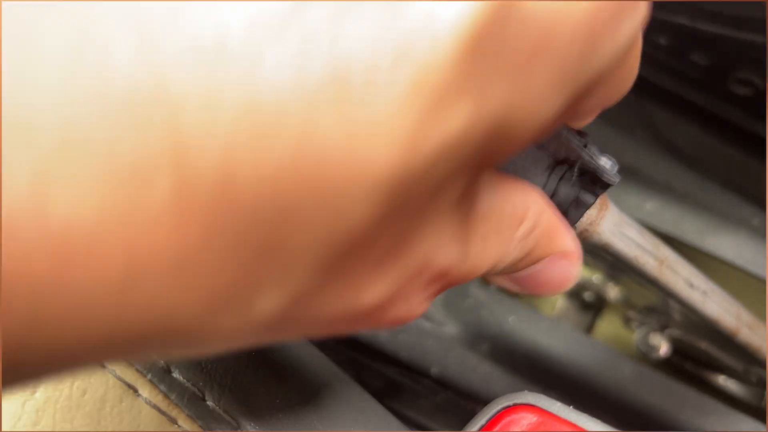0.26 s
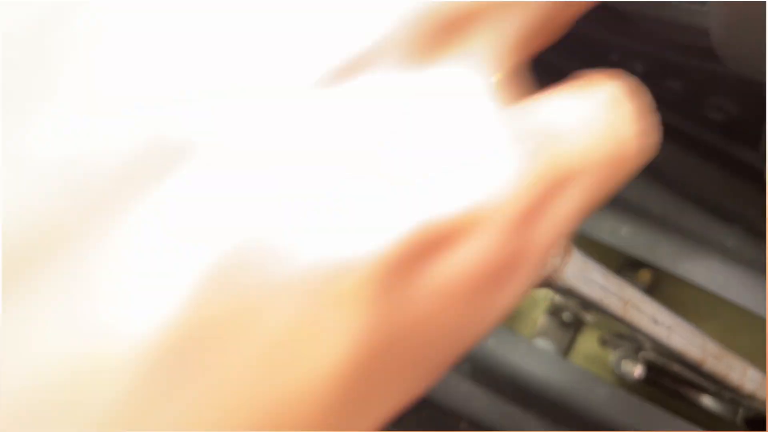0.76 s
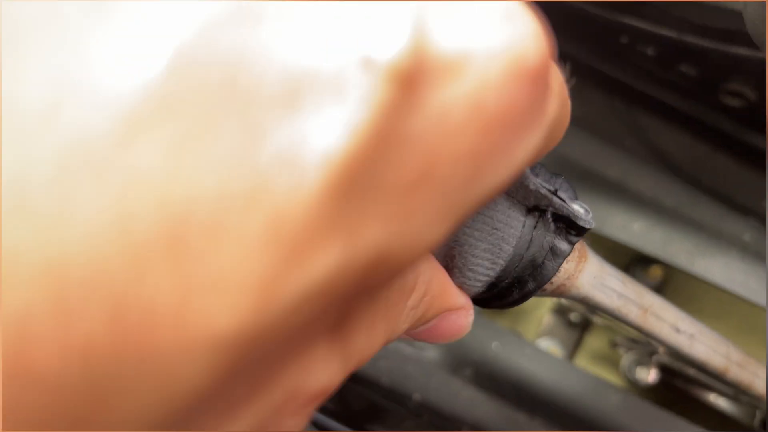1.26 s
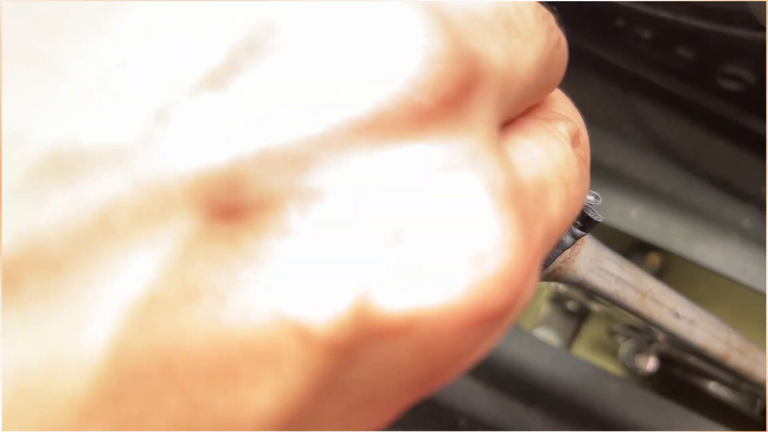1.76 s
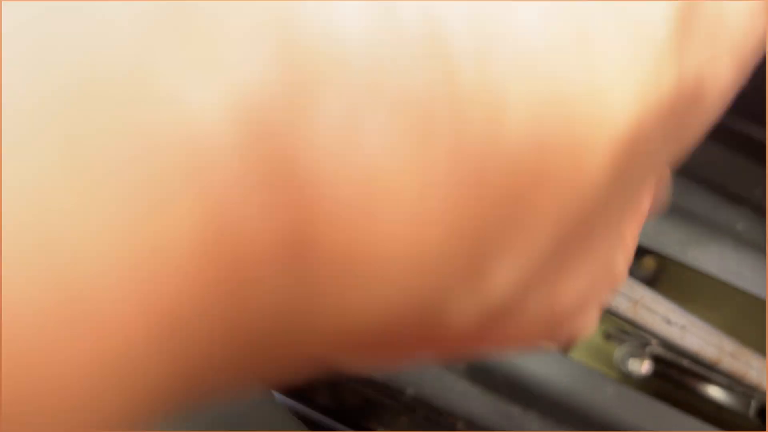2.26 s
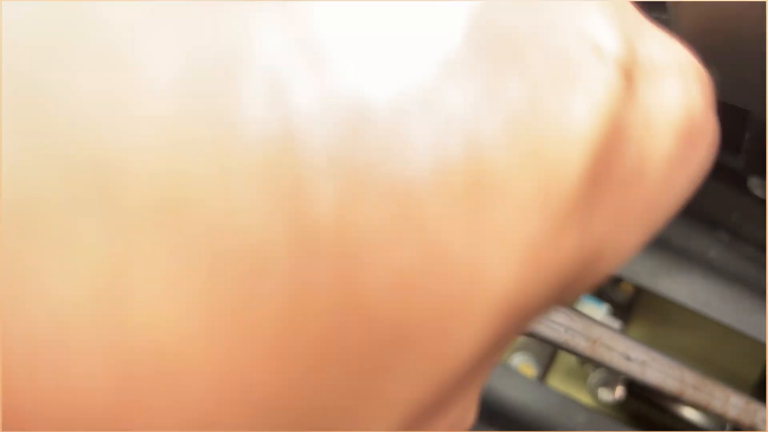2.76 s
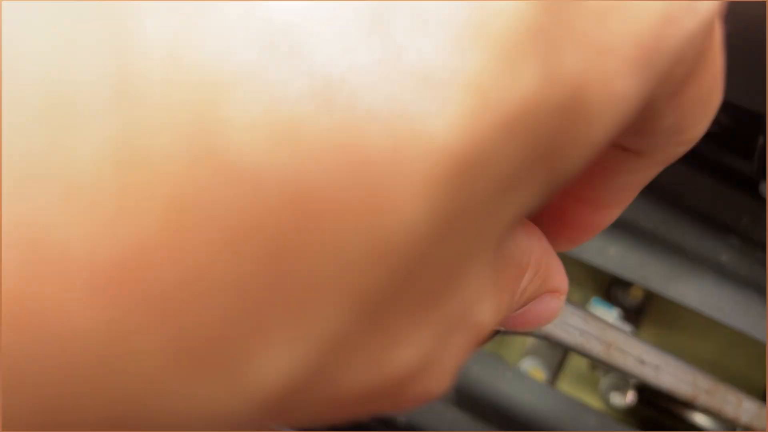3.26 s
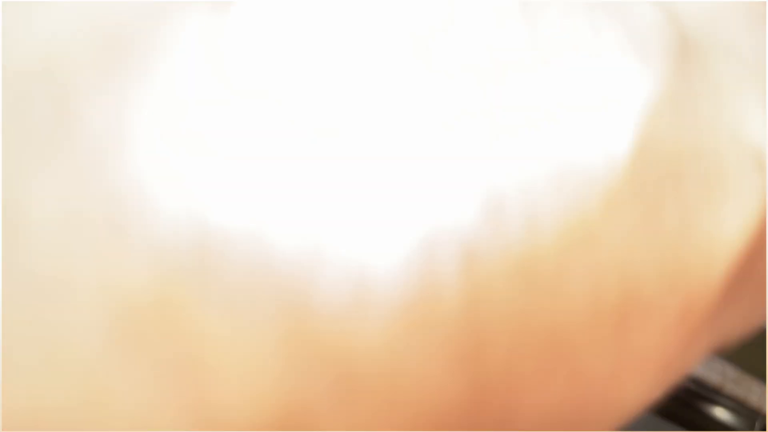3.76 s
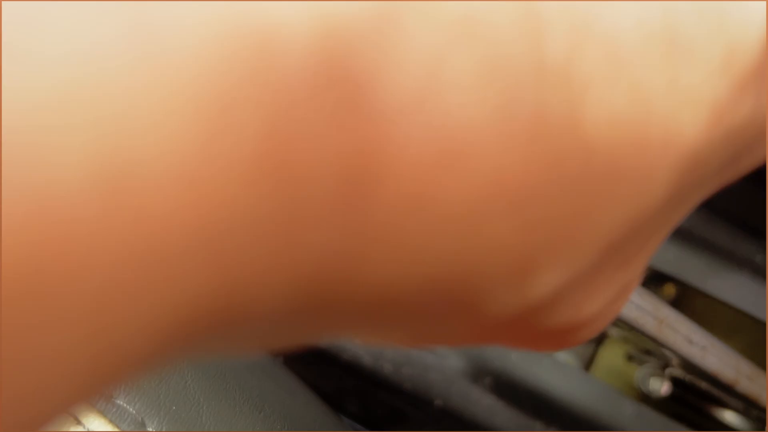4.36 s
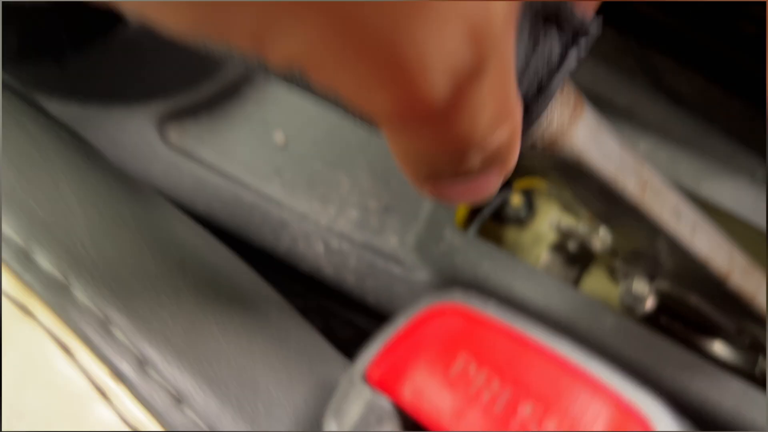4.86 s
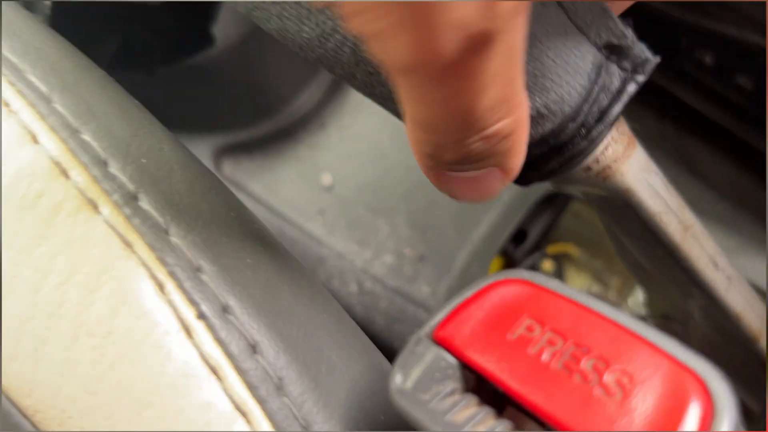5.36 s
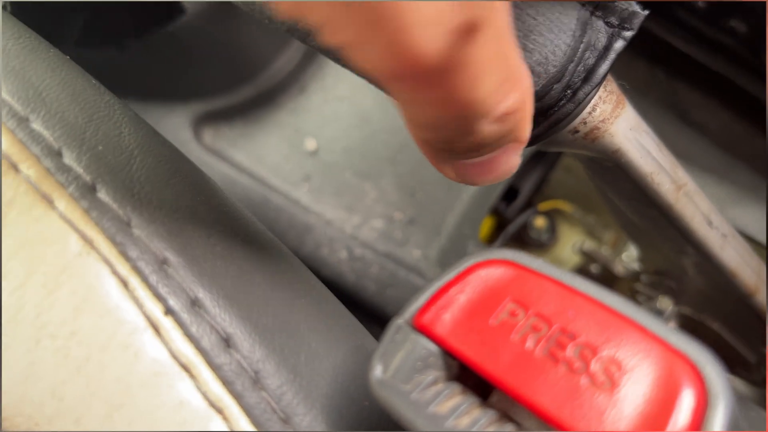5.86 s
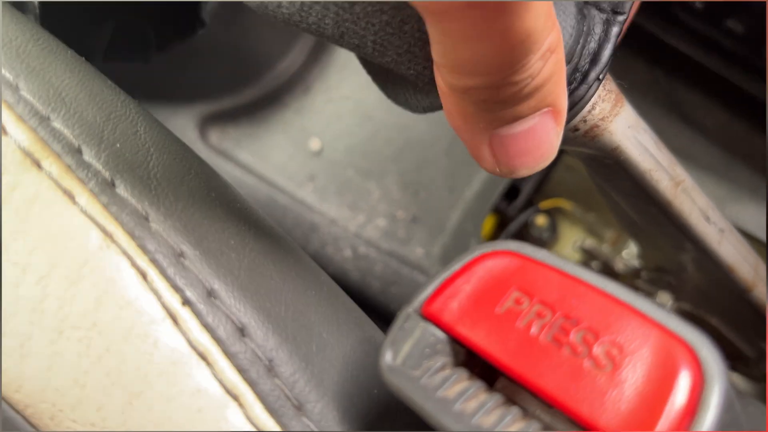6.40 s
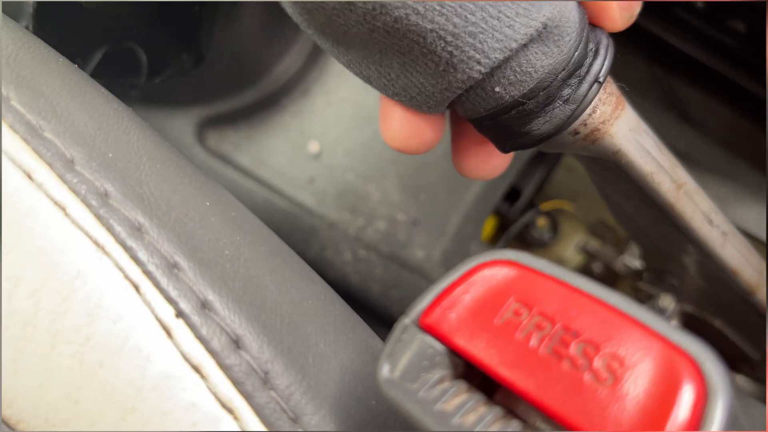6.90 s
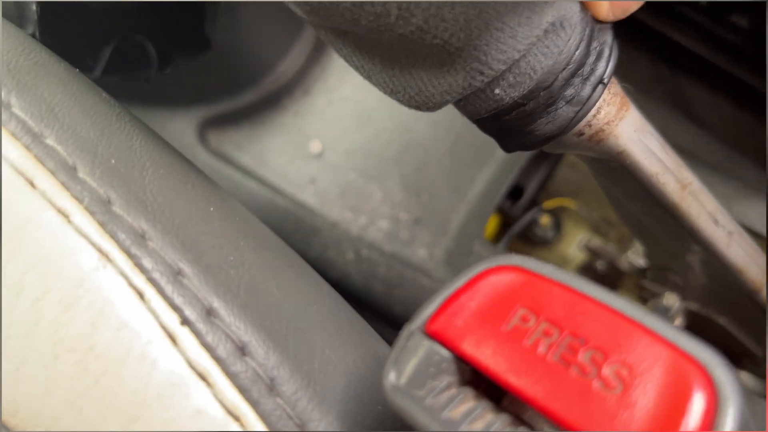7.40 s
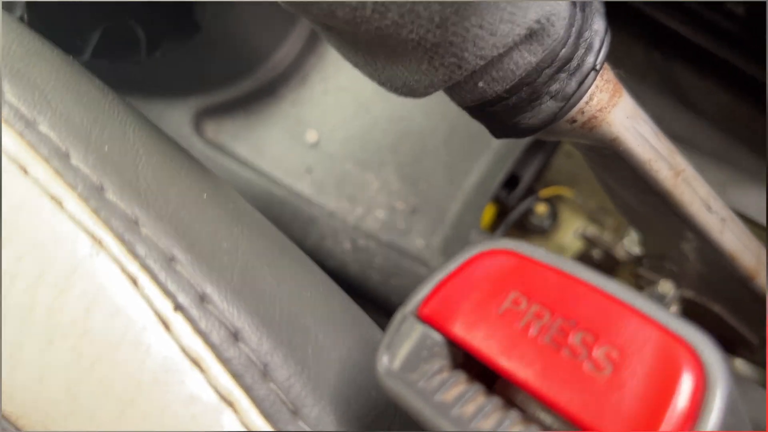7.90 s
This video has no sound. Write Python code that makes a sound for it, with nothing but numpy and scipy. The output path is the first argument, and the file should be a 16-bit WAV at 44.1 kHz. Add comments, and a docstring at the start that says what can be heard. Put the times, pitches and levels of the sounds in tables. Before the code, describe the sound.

Close-up fabric rustling with sharp plastic snaps, short scrapes and dull bumps, a tiny finger squeak midway, over a faint low hum in a car.

```python
"""A hand works a fabric boot with a plastic collar onto a lever in a small, dead car cabin, over a low hum.
From the start cloth swishes and rasps in filtered grains, the collar drags in stick-slip and soft bumps of
the trim settle on low pitches; an early instant is silent. Then noise-driven resonances snap, from 1.3 s the
rim knocks ringing console modes, and near 5 s a finger squeaks in gliding overtones; the cloth works on to
the end. Direct sound and short diffuse tails reach two close microphone ports."""
import sys
import numpy as np
from scipy import signal
from scipy.fft import rfft, irfft, next_fast_len
from scipy.io import wavfile
from scipy.ndimage import uniform_filter1d

SR = 44100
rng = np.random.default_rng(int(sys.argv[2]) if len(sys.argv) > 2 else 0)


def master_out(mix):
    """Clip the mix to full scale and print it as 16-bit PCM to the path in sys.argv[1]."""
    frames = np.transpose(np.atleast_2d(mix))
    ceiling = np.clip(frames, -1, 1)
    pcm = np.round(ceiling * 32767).astype(np.int16)
    wavfile.write(sys.argv[1], SR, pcm)


N = 358974
T = np.arange(N) / SR


def undb(db):
    """Decibels to gain."""
    return 10 ** (np.asarray(db) / 20)


def unit(x):
    """Scale to rms 1."""
    return x / np.sqrt(np.mean(x ** 2) + 1e-18)


def burst(x):
    """Scale a hit to the energy of 10 ms at rms 1."""
    return x / np.sqrt(np.sum(x ** 2) / (SR / 100) + 1e-18)


def add(out, s, x):
    """Mix x into out from time s in seconds."""
    i = max(int(s * SR), 0)
    out[i:i + len(x)] += x[:N - i]


def colour(x, points, size=16384):
    """Causal, minimum-phase filter with a smooth (Hz, dB) response."""
    points_hz, points_db = np.transpose(points)
    bins_hz = np.fft.rfftfreq(size, 1 / SR) + 1
    gain = undb(np.interp(np.log(bins_hz), np.log(points_hz), points_db))
    # folding the cepstrum forward in time makes the filter causal
    cepstrum = irfft(np.log(gain))
    cepstrum[1:size // 2] *= 2
    cepstrum[size // 2 + 1:] = 0
    impulse = irfft(np.exp(rfft(cepstrum)))
    return signal.fftconvolve(x, impulse[:len(x)])[:len(x)]


def resonate(x, hz, width):
    """One resonance, gain 1 at its centre; width in Hz."""
    return signal.lfilter(*signal.iirpeak(hz, hz / width, fs=SR), x)


def walk(rate):
    """Smooth random wander of rms near 1, with rate fresh values a second."""
    k = int(SR / rate)
    steps = np.repeat(rng.standard_normal(N // k + 1), k)
    return unit(uniform_filter1d(uniform_filter1d(steps, k), k)[:N])


def grains(rate, length, spread_db):
    """Random tiny slips, rate a second, a few much stronger than the rest."""
    chance = rng.random(length)
    size = np.minimum(rng.exponential(size=length), 4)
    return (chance < rate / SR) * undb(spread_db * size) * rng.choice([-1, 1], length)


def cabin(level_db=-44, hum_hz=80.94, hum_db=-47):
    """Low rumble and a wavering hum, alike at both ports, under a faint wide hiss."""
    # Spectrum of the cabin air. Each row: frequency in Hz, density in dB per Hz.
    air_spectrum = [(20, -13), (35, -12), (55, 0.5), (75, 3.5), (105, -9.5), (145, -9.5), (190, -16.5),
                    (240, -14), (330, -24.5), (520, -35), (700, -36.5), (2200, -48.5), (5000, -45.5),
                    (14000, -127)]
    mid = unit(colour(rng.standard_normal(N), air_spectrum))
    side = unit(colour(rng.standard_normal(N), air_spectrum))
    # the two ports differ mostly above the rumble
    side = colour(side, [(60, -35.5), (200, -19.0), (600, 4.0), (4000, 2.0)])
    hum_phase = 2 * np.pi * np.cumsum(hum_hz + 1.305 * walk(7)) / SR
    hum = np.sqrt(2) * np.sin(hum_phase) * undb(hum_db + 1.0 * walk(5.9))
    return undb(level_db) * (mid + np.array([side, -side])) + hum


def hand(speed_arch=1.08, press_arch=0.94, grip_swish_db=-71.5, grip_rasp_db=-64.5, grip_wander_db=0.1):
    """Speed and pressure of the hand in dB: each stroke swells and fades in one arch over a nearly steady grip."""
    # Strokes over the cloth. Each row: start in seconds, length in seconds, fastest point as 0-1 of the length,
    # speed (swish of the weave) in dB, pressure (rasp of the folds) in dB; cloth() trims and flickers them.
    strokes = [(0.0, 0.051, 0, -66, -55.5), (0.147, 0.15, 0.26, -62.5, -54.5),
               (0.274, .17, 0.38, -52.5, -56), (0.427, 0.27, 0.4, -52.5, -58),
               (0.883, 0.23, 0.56, -53, -54), (1.114, 0.48, 0.17, -60.5, -55),
               (1.541, 0.25, 0.68, -52.5, -49.5), (1.782, 0.17, 0.26, -63.5, -56.5),
               (1.915, 0.17, 0.44, -51, -63), (2.066, 0.2, 0.55, -46, -50), (2.225, 0.3, 0.07, -54, -55),
               (2.39, 0.26, 0.1, -54.5, -79), (2.558, 0.19, 0.51, -53, -57),
               (2.848, 0.18, 0.33, -58.5, -57.5), (2.949, 0.11, 0.61, -50, -53),
               (3.088, 0.21, 0.44, -51.5, -53), (3.318, 0.12, 0.46, -55, -65),
               (3.47, 0.095, 0.53, -60, -62), (3.803, 0.14, 0.18, -54, -50), (4.168, 0.099, 0.44, -48, -47),
               (4.26, .12, 0.46, -60, -54.5), (4.451, 0.16, 0.78, -54.5, -53),
               (4.6, 0.12, 0.42, -54.5, -51), (4.784, 0.2, 0.5, -62.5, -61),
               (5.203, 0.15, 0.24, -52.5, -54.5), (5.349, 0.091, 0.63, -56.5, -52.5),
               (5.576, 0.16, 0.46, -58, -52), (5.834, 0.19, 0.47, -52.5, -54.5),
               (5.99, 0.22, 0.62, -57, -53), (6.256, 0.24, 0.29, -53, -51.5),
               (6.36, 0.61, 0.52, -55, -52.5), (6.65, 0.19, 0.58, -47, -55.5),
               (6.862, 0.38, 0.56, -51.5, -58.5), (7.218, 0.4, 0.24, -66, -64),
               (7.512, 0.091, 0.6, -60.5, -60), (7.705, 0.12, 0.32, -46, -60),
               (7.759, 0.17, 0.64, -49.5, -54), (7.907, 0.34, 0.66, -50, -53)]
    grip = undb(grip_wander_db * walk(11))
    # strokes that overlap add as power
    speed = (undb(grip_swish_db) * grip) ** 2
    press = (undb(grip_rasp_db) * grip) ** 2
    for s, length, fastest, swish_db, rasp_db in strokes:
        peak_s = s + length * np.clip(fastest, .05, .95)
        progress = np.interp(T, [s, peak_s, s + length], [0, .5, 1])
        on = (progress > 0) & (progress < 1)
        arch = np.sin(np.pi * progress[on])
        speed[on] += (undb(swish_db) * arch ** speed_arch) ** 2
        press[on] += (undb(rasp_db) * arch ** press_arch) ** 2
    return 10 * np.log10(speed), 10 * np.log10(press)


def steady_octaves(x, vary_db=-0.06, vary_per_s=9):
    """The cloth keeps a nearly steady colour; its octave bands vary only imperceptibly."""
    size = next_fast_len(N)
    octave = np.clip(np.log2((np.fft.rfftfreq(size, 1 / SR) + 1) / 750), 0, 4)
    spectrum = rfft(x, size)
    out = np.zeros(N)
    for k in range(5):
        band = irfft(spectrum * np.maximum(1 - abs(octave - k), 0), size)[:N]
        out += band * undb(vary_db * walk(vary_per_s))
    return unit(out)


def cloth(speed_db, press_db, rasp_db=-3, weave_flicker_db=1.85, fold_flicker_db=2.0, brisk_db=-52,
          sheen_db=-14, sheen_power=2.07, snag_db=16, tension_db=4):
    """Threads flick past each other and sometimes snag, brighter when brisk; tension sways the weave's
    resonances, and pressed folds catch more coarsely."""
    # Spectra of the flicking threads, of brisk strokes and of pressed folds.
    # Each row: frequency in Hz, density in dB per Hz.
    swish_spectrum = [(300, -1), (1500, -6), (3200, -4.5), (5200, -5), (7500, -2), (9300, -6.5),
                      (11000, -8), (12500, -19), (15500, -13.5)]
    sheen_spectrum = [(4000, -17), (8000, -9), (10500, 6), (12500, 2), (15500, -11), (18000, -30)]
    rasp_spectrum = [(150, 2), (480, 12.5), (750, -9), (1200, 5), (2100, 6.5), (2700, 4), (3400, -12),
                     (4600, -20), (6000, -29), (12000, -40)]
    # Resonances of the taut weave. Each row: frequency in Hz, width in Hz, mean level in dB.
    weave_modes = [(1950, 220, -5.5), (3210, 160, -10.5), (4320, 540, -14), (7200, 980, -12),
                   (9000, 1160, -4)]
    # stroke speed in dB over a brisk stroke
    brisk = speed_db - brisk_db + weave_flicker_db * walk(70)
    snags = undb(snag_db) * grains(90, N, spread_db=2.5)
    threads = colour(grains(20000, N, spread_db=4.5) + snags, swish_spectrum)
    taut = sum(resonate(threads, hz, width) * undb(db + tension_db * walk(5.7))
               for hz, width, db in weave_modes)
    swish = steady_octaves(threads + taut) * undb(brisk)
    # the treble grows about twice as fast as the swish, in dB
    sheen = unit(colour(rng.standard_normal(N), sheen_spectrum)) * undb(sheen_db + sheen_power * brisk)
    rasp = unit(colour(grains(2800, N, spread_db=3.0), rasp_spectrum))
    rasp *= undb(press_db + rasp_db + fold_flicker_db * walk(50))
    return undb(brisk_db) * (swish + sheen) + rasp


def collar(force, detune=0.039):
    """The plastic collar's short rings, driven by a force; the grip shifts their pitches each time."""
    # Resonances of the collar. Each row: frequency in Hz before the shift, width in Hz, level in dB.
    collar_modes = [(894, 48, 3), (1040, 43, 1), (1147, 187, 5.5), (1380, 86, 9), (1630, 390, 0.5),
                    (2004, 97, 6), (2560, 80, 0), (3050, 240, 5), (3150, 690, 2.5), (4900, 110, -17)]
    shift = np.exp(detune * rng.standard_normal(len(collar_modes)))
    return sum((-1) ** k * undb(db) * resonate(force, hz * shift[k], width)
               for k, (hz, width, db) in enumerate(collar_modes))


def console(t, favoured_hz, scatter_db=1.0, swell_s=0.00091, detune=0.01, focus_db=5.5, focus_octaves=0.17):
    """The console's low modes build up after a blow; the spot that is struck favours those near one pitch."""
    # Modes of console and lever. Each row: frequency in Hz before a small random detuning,
    # t60 in seconds, level in dB before focus and scatter.
    console_modes = [(143.4, 0.1, 0.5), (228.4, 0.061, 3.5), (315, 0.041, -3.5), (390, 0.12, -3.5),
                     (462, 0.11, -3), (495, 0.07, 2.5), (566, 0.037, -4), (716, 0.032, -2.5),
                     (863, 0.072, -12), (1226, 0.026, -11.5)]
    ring = np.zeros(len(t))
    for hz, t60, db in console_modes:
        level_chance, sign_chance, pitch_chance = rng.standard_normal(3)
        focus = focus_db * np.exp(-(np.log2(hz / favoured_hz) / focus_octaves) ** 2)
        envelope = undb(db + focus + scatter_db * level_chance - 60 * t / t60)
        ring += envelope * np.sign(sign_chance) * np.sin(2 * np.pi * hz * (1 + detune * pitch_chance) * t)
    return ring * (1 - np.exp(-t / swell_s))


def drags(fade_db=5, muffled_db=-8):
    """Stick-slip of the collar and its cloth on the lever: a run of slips that starts hard and eases off."""
    # Drags of the collar. Each row: start in seconds, length in seconds, scrape level in dB,
    # console level in dB, slips a second, favoured console pitch in Hz.
    drag_list = [(0.0, 0.071, -67, -62, 167, 260), (0.262, .04, -60.5, -52, 170, 246),
                 (1.275, 0.23, -56, -45, 130, 240), (1.717, 0.031, -61.5, -61, 340, 850),
                 (2.184, 0.024, -61, -71, 200, 500), (2.279, 0.063, -70, -74, 130, 500),
                 (2.992, 0.049, -67.5, -69, 740, 477), (3.812, 0.13, -57.5, -64.5, 700, 445),
                 (4.18, 0.092, -53, -58, 270, 456), (4.311, 0.056, -59.5, -61.5, 400, 330),
                 (6.459, 0.17, -59.5, -57.5, 180, 478), (6.639, 0.15, -64, -58.5, 120, 500),
                 (7.528, 0.044, -64.5, -56, 550, 240), (7.73, 0.11, -57, -58, 220, 239)]
    # Spectrum of the scraping folds. Each row: frequency in Hz, density in dB per Hz.
    scrape_spectrum = [(300, 18), (750, -7.5), (1200, 2.5), (1800, 6), (2700, 4.5), (4000, -3), (5500, -12),
                       (7500, -2), (10000, -10), (15500, -39)]
    out, t = np.zeros(N), np.arange(SR // 4) / SR
    for s, length, scrape_db, body_db, rate, favoured_hz in drag_list:
        n = int(length * SR)
        # each slip scuffs for about a millisecond
        slips = signal.lfilter([1], [1, -np.exp(-1000 / SR)], abs(grains(rate, n, spread_db=1.5)))
        easing = undb(-fade_db * np.arange(n) / n)
        force = (unit(slips) + .5) * rng.standard_normal(n) * easing
        force = np.pad(force, (0, len(t)))  # room to ring out
        body = signal.fftconvolve(force, console(t, favoured_hz))[:len(force)]
        scrape = unit(colour(force, scrape_spectrum)) + undb(muffled_db) * unit(collar(force))
        mix = undb(scrape_db) * unit(scrape) + undb(body_db) * unit(body)
        # levels hold over the length of the drag, not over its padded tail
        add(out, s, mix * np.sqrt(len(force) / n))
    return out


def bumps(bend_s=0.00868, dull_db=-13):
    """A soft blow bends a padded panel: higher waves arrive first, then it settles on a low, dull pitch."""
    # Bumps of the hand on the trim. Each row: start in seconds, level of the tone's peak in dB,
    # first pitch in Hz, last pitch in Hz, rise in seconds, t60 in seconds.
    bump_list = [(0.0, -37.5, 295, 234, 0.0048, .18), (0.263, -41.5, 290, 235.5, 0.019, 0.37),
                 (1.269, -30, 428, 257, 0.0065, 0.081), (1.424, -36.5, 177, 132.5, 0.016, 0.25),
                 (1.716, -32.5, 474, 115, .008, 0.11), (2.944, -46.5, 750, 600, 0.0024, 0.017),
                 (3.033, -35, 198, 109, 0.0098, 0.068), (3.21, -30.5, 360, 262, 0.0083, 0.042),
                 (3.222, -38, 285, 221, 0.0092, 0.24), (4.238, -20.5, 720, 72, 0.036, .17),
                 (4.929, -42.5, 645, 470, 0.0057, 0.014), (5.9, -38.5, 470, 385, 0.0025, 0.014),
                 (7.39, -30.5, 406, 91.5, .013, 0.087), (7.449, -41, 382, 298, 0.0093, 0.06),
                 (7.535, -32, 376, 224, 0.011, 0.087), (7.737, -26, 200, 69.4, 0.022, 0.38)]
    out, t = np.zeros(N), np.arange(SR // 2) / SR
    for s, db, first_hz, last_hz, rise_s, t60 in bump_list:
        pitch = last_hz + (first_hz - last_hz) * np.exp(-t / bend_s)
        tone = np.sin(2 * np.pi * np.cumsum(pitch) / SR)
        noise = rng.standard_normal(len(t))
        padding = unit(resonate(resonate(noise, last_hz, last_hz), last_hz, last_hz))
        swell = np.sin(np.pi / 2 * np.minimum(t / rise_s, 1)) ** 2
        decay = undb(db - 60 * np.maximum(t - rise_s, 0) / t60)
        add(out, s, swell * decay * (tone + undb(dull_db) * padding))
    return out


def creaks(press_db, per_s=9.0, over_press_db=-5, hardness_db=-10.5, middle_hz=2020, count=110):
    """Faint snaps at random moments as the collar shifts, stronger the harder the hand presses."""
    times = np.cumsum(rng.exponential(size=count)) / per_s
    octaves = np.clip(rng.standard_normal(count) / 2, -1, 1)
    return [(s, press_db[int(s * SR)] + over_press_db, hardness_db, middle_hz * 2 ** octave)
            for s, octave in zip(times, octaves) if s < T[-1]]


def even(force, size=120):
    """Level out the broad dips in the spectrum of a short force, so that it drives every resonance."""
    spectrum = rfft(force)
    power = abs(uniform_filter1d(abs(spectrum) ** 2, size))
    return irfft(spectrum / np.sqrt(power + 1e-18), len(force))


def snaps(events, creep_db=-14, chatter_db=-18, chatter_s=0.0092, edge_width_hz=850, knock_lag_s=0.00402,
          knock_hz=320, hard_knock_db=-34.5, hard_tick_db=-34, knock_slope=0.54):
    """The collar's edge creeps, lets go within a millisecond and chatters; the louder its tick, the more
    it knocks the console."""
    # Spectrum of the sharp tick. Each row: frequency in Hz, density in dB per Hz.
    tick_spectrum = [(800, -15.5), (2500, -4.5), (4700, -1), (6000, -2.5), (7200, 0.5), (9000, -2.5),
                     (12000, -12.5), (15500, -27)]
    lead, creep_s, slip_s = .007, .002, .0007  # seconds; lead is the moment of the snap within the burst
    out, t = np.zeros(N), np.arange(SR // 10) / SR
    brief = t[:2048]
    since = np.maximum(brief - lead + slip_s, 0)
    creep = undb(creep_db) * np.exp(-abs(brief - lead) / creep_s)
    slip = (since / slip_s) ** 2 * np.exp(2 - 2 * since / slip_s) + creep
    for s, ring_db, hardness_db, hz in events:
        tick_db = ring_db + hardness_db
        knock_db = hard_knock_db + knock_slope * (tick_db - hard_tick_db)
        chatter = unit(grains(2400, len(brief), spread_db=2.5))
        chatter *= undb(chatter_db) * (since > 0) * np.exp(-since / chatter_s)
        force = even(slip * rng.standard_normal(len(brief)) + chatter)
        # the edge rings at this snap's own pitch, as strongly as the whole collar
        edge = resonate(resonate(force, hz, edge_width_hz), hz, edge_width_hz)
        plastic = burst(collar(force)) + burst(edge)
        tick = burst(colour(force, tick_spectrum, size=1024))
        add(out, s - lead, undb(tick_db) * tick + undb(ring_db) * burst(plastic))
        add(out, s + knock_lag_s, undb(knock_db) * burst(console(t, knock_hz)))
    return out


def knocks():
    """The rim drops against the console and rings its low modes."""
    # Knocks of the collar's rim. Each row: start in seconds, level in dB, favoured console pitch in Hz.
    knock_list = [(1.283, -37.5, 500), (1.345, -39, 490), (1.381, -38, 500), (1.491, -42, 490),
                  (1.721, -31, 420), (5.008, -47.5, 413), (6.345, -44.5, 474), (6.464, -45, 600),
                  (6.492, -40, 500), (6.533, -37.5, 487), (6.561, -33, 484), (6.637, -47, 490),
                  (6.703, -49, 500), (6.853, -49, 480), (6.884, -45.5, 540), (7.038, -49, 480),
                  (7.267, -53, 400), (7.789, -43.5, 571)]
    out, t = np.zeros(N), np.arange(SR // 6) / SR
    for s, db, favoured_hz in knock_list:
        add(out, s, undb(db) * burst(console(t, favoured_hz)))
    return out


def squeak(waver=0.076, catch_db=3, top_hz=3420):
    """A fingertip sticks and slips, chirping downward as it slows and grips."""
    # Squeaks of a finger on the boot. Each row: start in seconds, length in seconds, first pitch in Hz and
    # last pitch in Hz before wavering, mean level in dB, step from one overtone to the next in dB.
    squeak_list = [(4.89, 0.024, 2750, 1550, -61, -25), (4.921, 0.0095, 1670, 1150, -54, -19),
                   (5.002, 0.006, 472, 435, -57, 1)]
    out, wobble, catches = np.zeros(N), walk(1200), walk(300)
    for s, length, first_hz, last_hz, db, overtone_db in squeak_list:
        i, n = int(s * SR), int(length * SR)
        hz = np.geomspace(first_hz, last_hz, n) * (1 + waver * wobble[i:i + n])
        phase = 2 * np.pi * np.cumsum(hz) / SR
        # overtones stay below top_hz
        slips = sum(undb(overtone_db * (k - 1)) * (k * hz < top_hz) * np.sin(k * phase) for k in range(1, 8))
        add(out, s, undb(db + catch_db * catches[i:i + n]) * signal.windows.tukey(n, .5) * slips)
    return out


def ports(x, side_db, front_db, t60, near_s=0.00082, left_lag_ms=0.019):
    """Two microphone ports hear the hand directly, then by way of seats and trim, from front and sides."""
    t = np.arange(SR // 6) / SR
    # the left port is further from the hand
    lag = np.exp(-2j * np.pi * np.fft.rfftfreq(N, 1 / SR) * left_lag_ms / 1000)
    out = np.array([irfft(rfft(x) * lag, N), x])
    tail_colour = [(120, -20.5), (300, -12.5), (520, -0.5), (1000, -0.5), (2500, -1.5), (7000, 1.5),
                   (14000, -7.0)]  # Hz, dB
    # the front tail is alike at both ports, the side tail opposite in sign
    for db, signs in ((front_db, [[1], [1]]), (side_db, [[1], [-1]])):
        tail = rng.standard_normal(len(t)) * undb(-60 * t / t60) * (t > near_s)
        tail = colour(tail / np.linalg.norm(tail), tail_colour)
        out = out + undb(db) * np.array(signs) * signal.fftconvolve(x, tail)[:N]
    return out


def scene(left_db=0.23, spread_db=-10):
    """The handling happens just off centre; cloth spreads around the lever, hard parts sound from one spot."""
    # Snaps of the collar. Each row: moment in seconds, plastic ring in dB,
    # hardness (tick over ring) in dB, ring pitch in Hz.
    snap_list = [(0.1709, -43, -6, 1160), (0.2416, -52, 5.5, 3040), (0.2617, -40.5, 2, 3080),
                 (0.2796, -41.5, 3.5, 3120), (1.12, -48.5, -16, 1160), (1.1903, -48, -6, 2830),
                 (1.2056, -48, -0.5, 1770), (1.2551, -31, -8.5, 1480), (1.272, -31.5, -17, 2530),
                 (1.2827, -40, -17, 1550), (1.2979, -37.5, -1.5, 1610), (1.3068, -40.5, -6, 2510),
                 (1.3175, -55, -10, 2200), (1.3375, -38, 5, 3200), (1.373, -33, 0, 1740),
                 (1.402, -32.5, -4, 2960), (1.4222, -38, 7, 4500), (1.4438, -33.5, 0, 1620),
                 (1.483, -34, 0.5, 2670), (1.5963, -49.5, 0.5, 1580), (1.6079, -57, 12.5, 4540),
                 (1.7152, -32.5, 0, 1020), (1.727, -40.5, -8, 950), (1.735, -46, -5, 1100),
                 (1.9895, -51, -18, 1200), (2.0723, -47.5, -14, 1270), (2.1825, -60, -5, 2200),
                 (2.1926, -44, -23, 1930), (2.2045, -50, -10, 1980), (2.276, -48, -4, 1990),
                 (2.3095, -48, -10, 1250), (2.329, -44.5, -18, 1900), (3.123, -50, -19, 1240),
                 (3.2095, -50.5, -16, 1400), (3.2645, -62, -2, 4500), (3.5149, -47, -25, 1350),
                 (3.8146, -40.5, -14, 1720), (4.1324, -57.5, -11, 1120), (4.1805, -45.5, -0.5, 1150),
                 (4.212, -50, -15, 1180), (4.3004, -48.5, -1.5, 1810), (4.3735, -48, -4.5, 2010),
                 (5.026, -65.5, 6.5, 3000), (6.3377, -46, 3.5, 2580), (6.4575, -38, -4, 2380),
                 (6.4614, -49.5, 10, 1370), (6.4868, -41, -2, 2250), (6.5085, -52, -10, 2400),
                 (6.5228, -51.5, 1, 2370), (6.5539, -41.5, -4, 2350), (6.6626, -49.5, -20, 2620),
                 (6.884, -52, -2, 2000), (7.2665, -57, -11, 1710), (7.3205, -66, -13, 2000),
                 (7.3925, -62, -9, 2200), (7.459, -60.5, -7, 900), (7.5164, -50.5, 0, 2580),
                 (7.536, -39.5, -25, 1900), (7.7348, -41.5, 1.5, 2330), (7.7622, -48, 2.5, 1250),
                 (7.775, -48, -13, 1700), (7.7875, -44.5, 0.5, 2160), (8.018, -55, 1, 2200),
                 (8.074, -52, -5, 3700)]
    air = cabin()
    speed_db, press_db = hand()
    # a second, independent cloth layer, opposite in sign at the two ports
    folds = undb(spread_db) * cloth(speed_db, press_db)
    soft = ports(cloth(speed_db, press_db) + squeak(), side_db=-7, front_db=-9, t60=.06)
    soft = soft + np.array([folds, -folds])
    hits = drags() + bumps() + snaps(snap_list + creaks(press_db)) + knocks()
    hard = ports(hits, side_db=-4.5, front_db=-13, t60=.03)
    return (soft + hard) * undb([[left_db], [-left_db]]) + air


def record(dry, top_hz=15900):
    """The sound drops out for an instant near the start; the top is cut steeply."""
    # The silent instant: start in seconds, end in seconds.
    mute_span = (0.040, 0.088)
    live = uniform_filter1d(1. * ((T < mute_span[0]) | (T > mute_span[1])), size=64)  # short fades
    top_cut = signal.ellip(8, .2, 70, top_hz, fs=SR, output="sos")
    return signal.sosfilt(top_cut, dry * live)


dry = scene()
out = record(dry)
master_out(out)
```